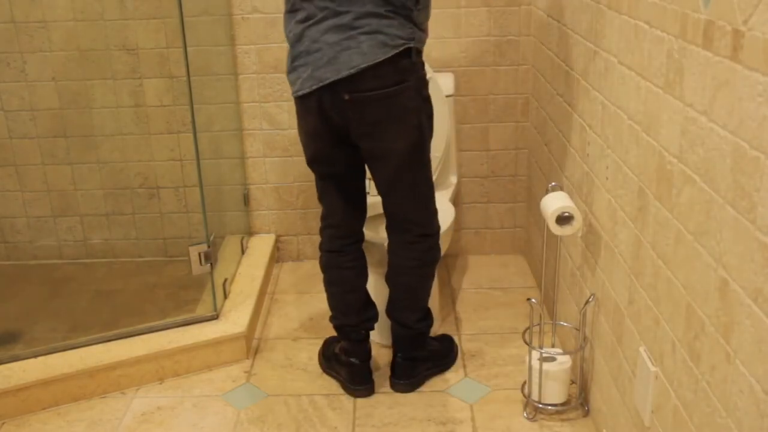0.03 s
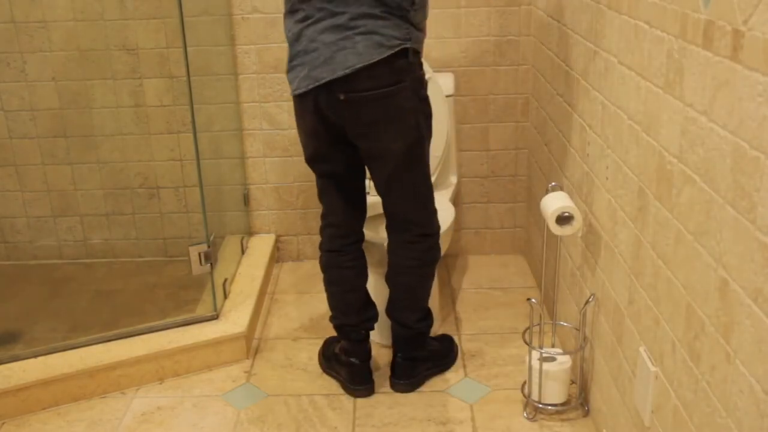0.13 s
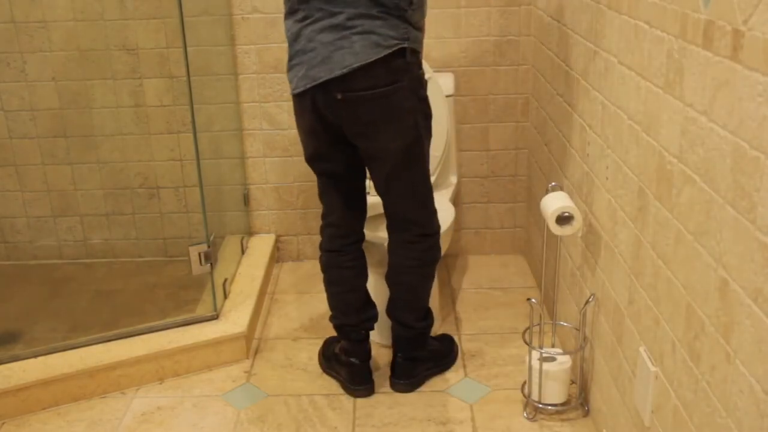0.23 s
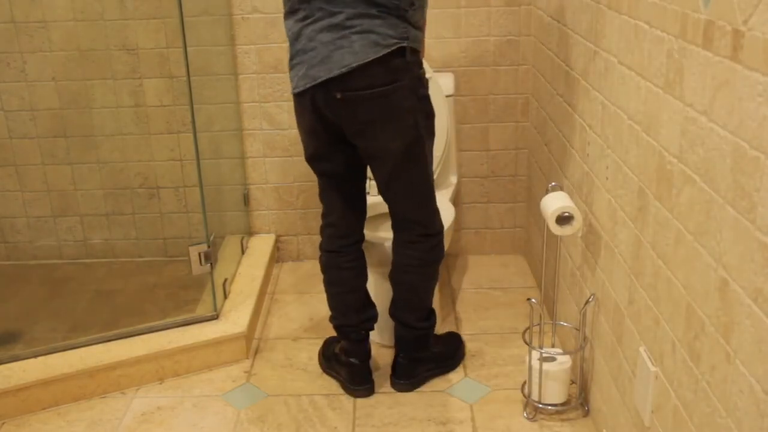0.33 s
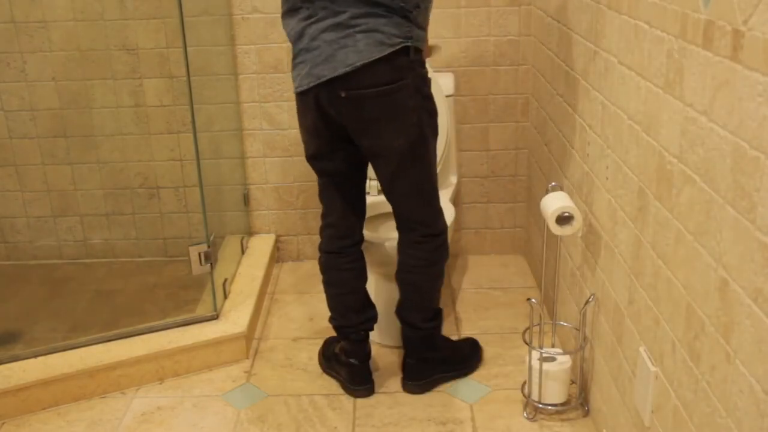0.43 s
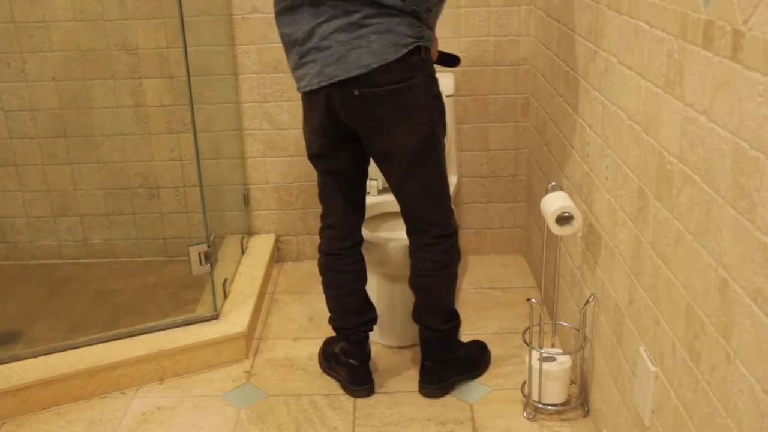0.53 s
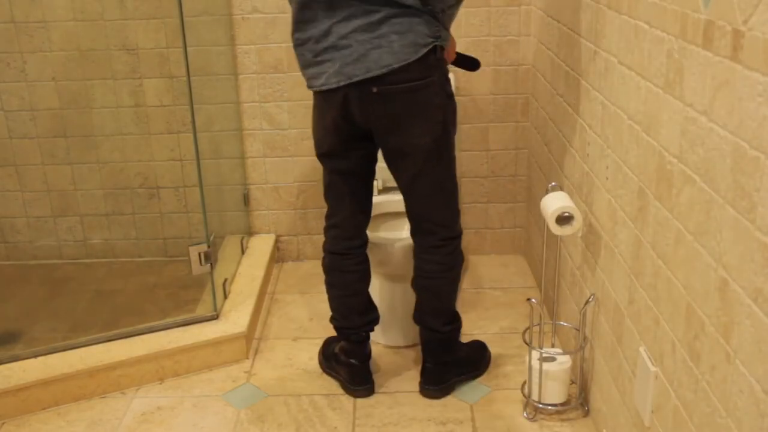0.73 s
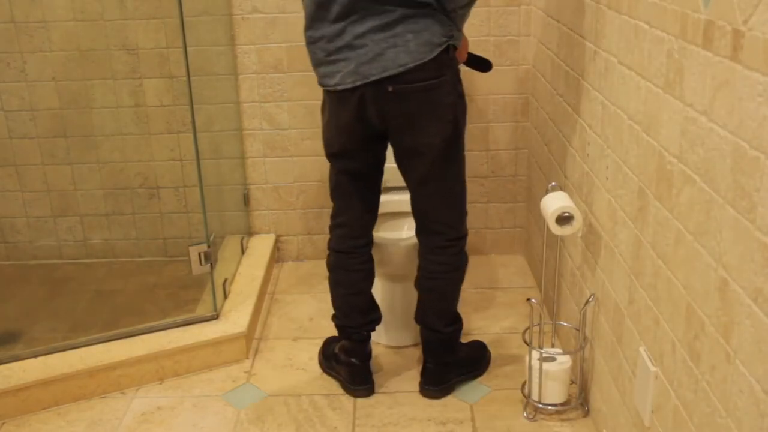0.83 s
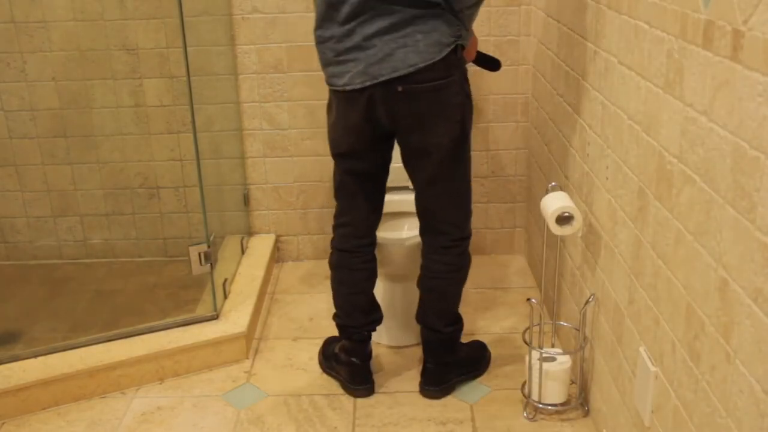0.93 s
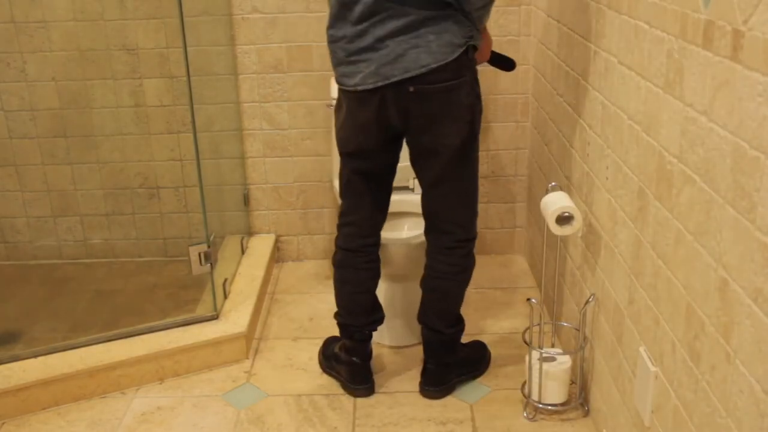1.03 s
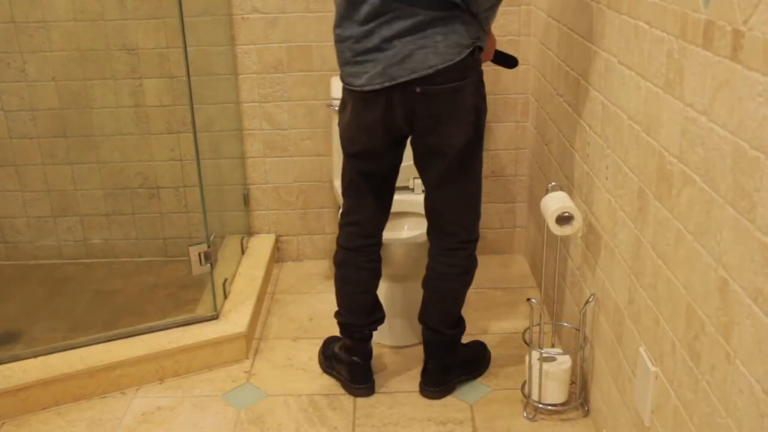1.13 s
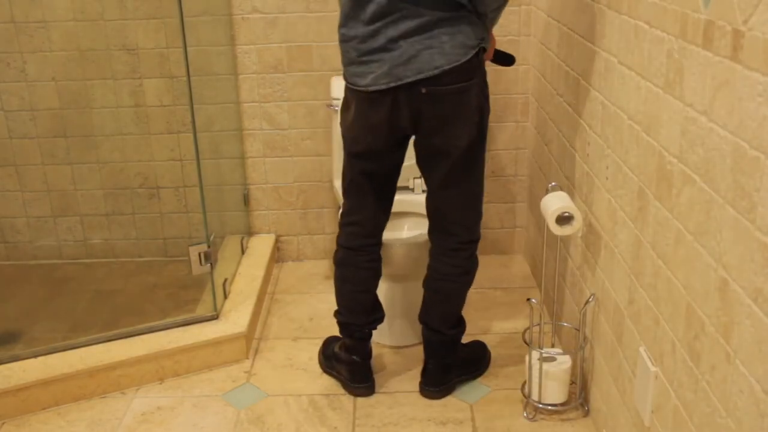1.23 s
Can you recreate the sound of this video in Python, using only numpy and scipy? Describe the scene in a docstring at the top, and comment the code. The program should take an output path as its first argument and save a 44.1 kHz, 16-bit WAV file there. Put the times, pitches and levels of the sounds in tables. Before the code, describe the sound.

A toilet lid knocks against the tank and rebounds, echoing in a tiled bathroom.

```python
"""A toilet lid, swung up, knocks against the tank in a tiled bathroom and rebounds a few times.
Each impact excites a clack, a snap, a thud and the lid's own modes; reflections from the hard walls
and the room's standing waves stretch it into a long ringing tail. Afterwards friction makes
clothes rustle and a shoe scuff the tiles, over a quiet, steady room tone."""
import sys
import numpy as np
from scipy import signal
from scipy.fft import rfft, irfft
from scipy.io import wavfile
from scipy.ndimage import uniform_filter1d

SR = 44100
rng = np.random.default_rng(int(sys.argv[2]) if len(sys.argv) > 2 else 0)


def pcm_store(signal):
    """Save signal as 16-bit PCM."""
    levels = np.round(np.clip(np.atleast_2d(signal), -1, 1) * 32767)
    wavfile.write(sys.argv[1], SR, levels.astype(np.int16).T)


N = 57330

# Background noise of the room. Each row: frequency in Hz, relative spectral density in dB.
TONE_SPECTRUM = [(25, -18), (48, -12), (75, -7), (110, -3), (200, -0.5), (300, -9.5), (480, -8),
                 (660, -5.5), (900, -12), (1270, -11.5), (1950, -15), (2900, -16.5), (5600, -22.5),
                 (9000, -26.5), (15500, -39.5)]
# Impacts of lid on tank; the thud rises in pitch over the rebounds and drops back on the last.
# Each row: start in seconds, level in dB, force rise time in ms, thud frequency in Hz,
# relative thud level in dB.
IMPACTS = [(.2104, 0, .04, 430, -16), (.2902, -4.4, .055, 456, -15), (.3225, -12.5, .1, 513, -28),
           (.3295, -12, .1, 526, -9), (.3435, -11.5, .11, 529, -8), (.364, -18, .15, 547, -1),
           (.422, -16.5, .08, 430, -15)]
# The lid's dense, quickly damped clack. Each row: frequency in Hz, relative spectral density in dB.
CLACK_SPECTRUM = [(30, -44), (60, -33.5), (125, -9), (200, -13.5), (290, -9), (470, -2.5), (780, -8),
                  (1050, -3.5), (1400, 1), (1750, -3), (2400, -3.5), (3400, -4), (4300, -11), (6500, -19),
                  (9000, -26), (15000, -38)]
# The lid's hard edge snapping on porcelain just after each landing.
# Each row: frequency in Hz, relative spectral density in dB.
SNAP_SPECTRUM = [(100, -43), (1000, -13), (2000, -8), (3000, 9), (4200, -9), (7000, -11), (10000, -26),
                 (15000, -49)]
# Upper modes of the lid. Each row: frequency in Hz, relative level in dB, 60 dB decay time in seconds.
LID_MODES = [(1010, -34, 0.13), (2020, -20, 0.11), (2616, -43, 0.091), (3280, -40, 0.065)]
# Standing waves of the room. Each row: frequency in Hz, relative level in dB, 60 dB decay time in seconds.
ROOM_MODES = [(126.8, -42, .83), (149.6, -43, .87), (279.2, -35, .7), (303, -41, .81), (353, -38, .81),
              (377, -40, .83), (429.3, -32, .72), (465.9, -29, .72), (487.7, -41, .86), (545.6, -42, .85),
              (629.4, -40, .97), (665.4, -33, .87), (1211, -30, .79), (1264.6, -39, .88),
              (1354.8, -26, .77), (1378.2, -24, .55), (1413.3, -31, .8), (1451.8, -26, .55),
              (1542.1, -33, .82), (1594.2, -33, .83)]
# Reverberation of the tiled room. Each row: frequency in Hz, 60 dB decay time in seconds.
REVERB_TIMES = [(100, 1.2), (300, 1.06), (700, 1.127), (1400, .97), (2800, 1.017), (5000, 1.16),
                (9000, 1.16), (15000, 0.44)]
# Echoes from the nearest walls, together louder than the direct sound, which the person's body screens.
# Each row: delay in seconds, gain in dB.
EARLY_REFLECTIONS = [(.0019, -17.5), (.0047, -11.5), (.0058, -22.5), (0.0109, -18.5)]
# Clothes brushing. Each row: start in seconds, duration in seconds, level in dB.
CLOTH_STROKES = [(0.4, 0.13, -44), (0.834, 0.073, -52.5)]
# Hiss of rubbing fabric. Each row: frequency in Hz, relative spectral density in dB.
CLOTH_SPECTRUM = [(100, -25), (1000, 2), (4000, 5), (8000, 3.5), (10500, -4.5), (15000, -18)]
# The shoe scuffing the tiles. Each row: start in seconds, duration in seconds, level in dB.
SHOE_STROKES = [(1.030, 0.028, -44.5), (1.082, 0.044, -48)]
# Friction noise of the sole. Each row: frequency in Hz, relative spectral density in dB.
SOLE_SPECTRUM = [(40, -27), (150, -21), (350, -1.5), (650, -3), (1200, -7), (3000, -17.5), (6000, -23.5),
                 (15000, -43)]


def amp(db):
    """Amplitude ratio for a level in decibels."""
    return 10 ** (np.asarray(db) / 20)


def curve_at(points, hz):
    """Interpolation of a table on a logarithmic frequency axis."""
    frequencies, values = np.transpose(points)
    return np.interp(np.log(hz + 1), np.log(frequencies + 1), values)


def add(mix, start_s, sound):
    """Superposition: a sound adds to the mix from its start time on."""
    part = mix[round(start_s * SR):][:len(sound)]
    part += sound[:len(part)]


def through(x, response):
    """A linear system convolves its input with its impulse response."""
    return signal.fftconvolve(x, response)[:N]


def noise(spectrum):
    """Spectral shaping colours white noise; the result has rms 1."""
    gain = amp(curve_at(spectrum, np.fft.rfftfreq(N, 1 / SR)))
    coloured = irfft(rfft(rng.standard_normal(N)) * gain, N)
    return coloured / np.sqrt(np.mean(coloured ** 2))


def room_tone(level_db=-49):
    """Stationary noise forms a quiet background, strongest in the bass."""
    return amp(level_db) * noise(TONE_SPECTRUM)


def click(spectrum, size=8192):
    """A minimum-phase pulse of energy 1 arrives as early as its spectrum allows."""
    hz = abs(np.fft.fftfreq(size, 1 / SR))
    log_gain = np.log(amp(curve_at(spectrum, hz)))
    minimum_phase = np.exp(np.conj(signal.hilbert(log_gain)))
    pulse = np.fft.ifft(minimum_phase).real[:size // 2]
    return pulse / np.linalg.norm(pulse)


def contact_force(rise_ms):
    """An impact delivers a unit impulse; the longer the contact, the less treble it excites."""
    rise_times = np.arange(1, 200) / SR * 1000 / rise_ms
    force = rise_times * np.exp(-rise_times)
    return force / force.sum()


def ring(modes):
    """Free vibration is a sum of exponentially damped sinusoids, one for each mode."""
    t = np.arange(N) / SR
    return sum(amp(db) * 1000 ** (-t / t60) * np.sin(2 * np.pi * hz * t) for hz, db, t60 in modes)


def reverberation(build_cycles=2.6, spacing=8):
    """A diffuse field of energy 1: dense random echoes, which absorption damps at each band's own rate."""
    echoes = np.zeros(N)
    slots = np.arange(SR // 1000, N - spacing, spacing)
    echoes[slots + rng.integers(0, spacing, len(slots))] = rng.choice([-1., 1.], len(slots))
    hz, t, bands = signal.stft(echoes, SR, nperseg=256)
    swell = 1 - np.exp(-t * (hz[:, None] + 1) / build_cycles)  # the bass arrives last
    decay = 1000 ** (-t / curve_at(REVERB_TIMES, hz)[:, None])
    tail = signal.istft(bands * swell * decay, SR)[1][:N]
    return tail / np.linalg.norm(tail)


def bathroom(direct_db=-16.5):
    """A room's impulse response consists of direct sound, early reflections and a diffuse tail."""
    response = reverberation()
    response[0] += amp(direct_db)
    for delay_s, db in EARLY_REFLECTIONS:
        add(response, delay_s, amp([db]))
    return response


def lid(clack_db=17, snap_db=4.5, snap_delay_s=.0047, thud_t60_s=.13, radiation_hz=199, build_s=.01):
    """Impact excitation: each blow drives a clack, a snap, a thud and the modes of lid and room."""
    attack = through(bathroom(), amp(clack_db) * click(CLACK_SPECTRUM))
    add(attack, snap_delay_s, amp(snap_db) * click(SNAP_SPECTRUM))
    # The lid is too small to radiate bass.
    radiation = signal.butter(2, radiation_hz, "high", fs=SR, output="sos")
    upper_modes = ring(LID_MODES)
    build_up = 1 - np.exp(-np.arange(N) / SR / build_s)
    standing_waves = ring(ROOM_MODES) * build_up
    knocks = np.zeros(N)
    for start_s, db, rise_ms, thud_hz, thud_db in IMPACTS:
        thud = ring([(thud_hz, thud_db, thud_t60_s)])
        body = signal.sosfilt(radiation, upper_modes + thud)
        knock = through(attack + body + standing_waves, contact_force(rise_ms))
        add(knocks, start_s, amp(db) * knock)
    return knocks


def strokes(rows):
    """Friction noise swells and fades with the motion: a half-sine envelope for each stroke."""
    envelope = np.zeros(N)
    for start_s, length_s, db in rows:
        t = np.arange(0, length_s, 1 / SR)
        add(envelope, start_s, amp(db) * np.sin(np.pi * t / length_s))
    return envelope


def clothes(direct_db=-4, reverb_db=-2.5):
    """Friction of fabric on fabric radiates short swells of hiss, which the room prolongs."""
    hiss = strokes(CLOTH_STROKES) * noise(CLOTH_SPECTRUM)
    return amp(direct_db) * hiss + amp(reverb_db) * through(hiss, reverberation())


def shoe(reverb_db=-3):
    """Sliding friction of a sole on tile makes soft, dull scuffs that reverberate."""
    scuffs = strokes(SHOE_STROKES) * noise(SOLE_SPECTRUM)
    return scuffs + amp(reverb_db) * through(scuffs, reverberation())


def scene():
    """The pressures of all sources superpose at one listening point."""
    return (lid() + shoe() + clothes() + room_tone())[None]


def record(dry, cutoff_hz=15750):
    """A linear-phase low-pass filter removes the highest treble."""
    low_pass = signal.firwin(511, cutoff_hz, window=("kaiser", 9), fs=SR)
    return signal.oaconvolve(dry, low_pass[None], "same")


dry = scene()
out = record(dry)
pcm_store(out)
```